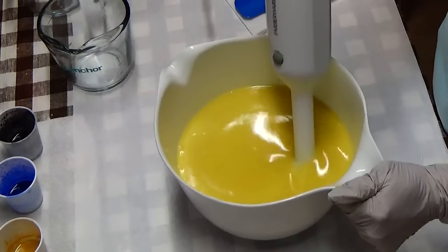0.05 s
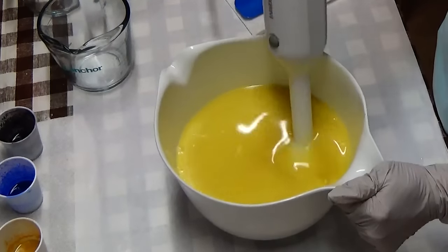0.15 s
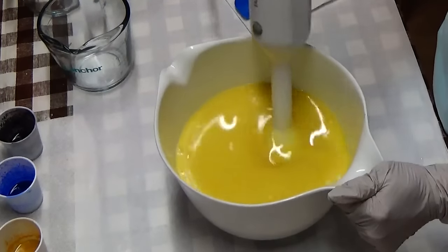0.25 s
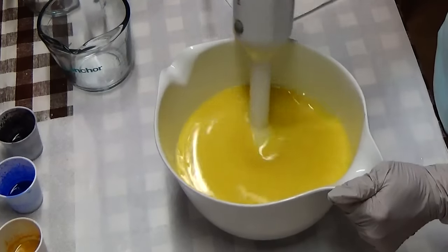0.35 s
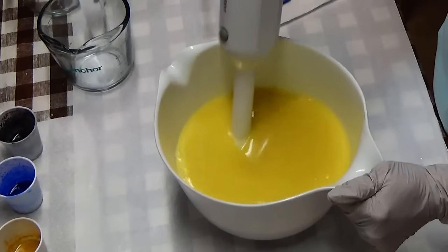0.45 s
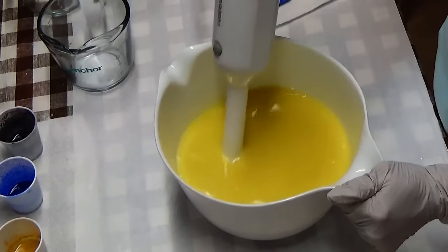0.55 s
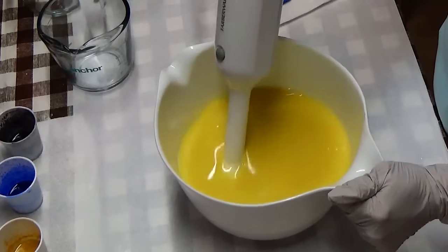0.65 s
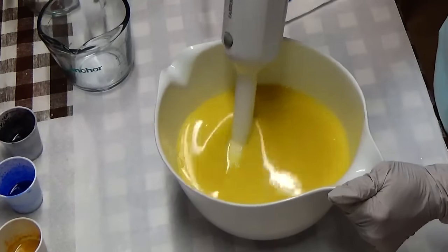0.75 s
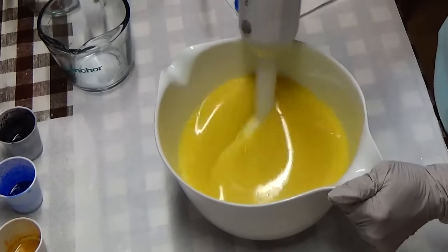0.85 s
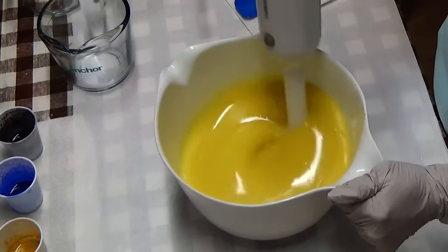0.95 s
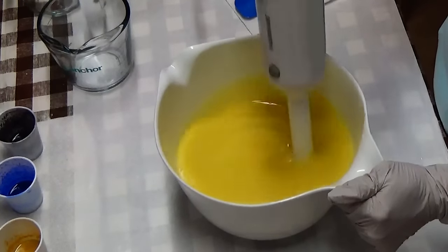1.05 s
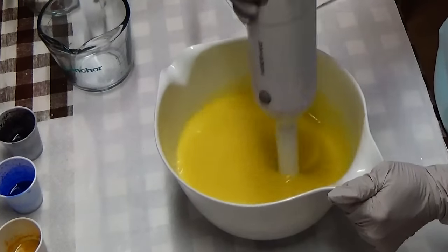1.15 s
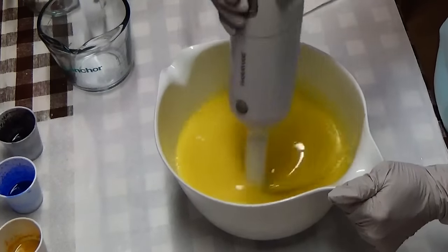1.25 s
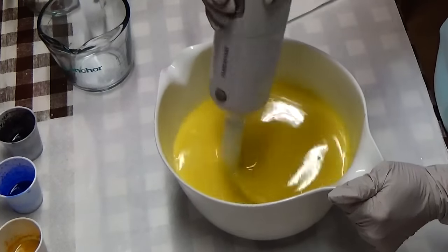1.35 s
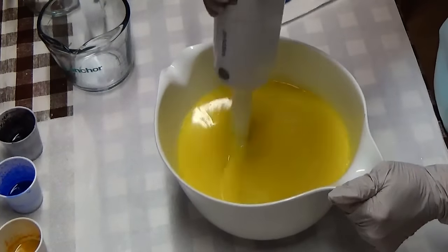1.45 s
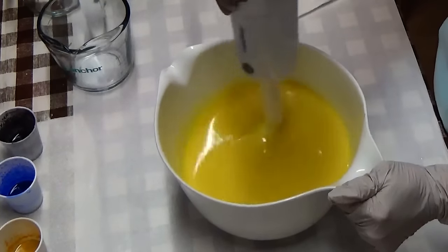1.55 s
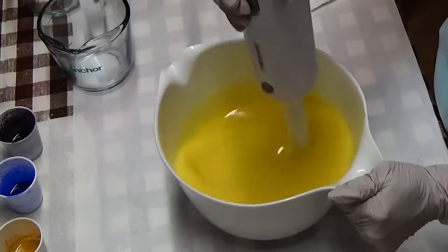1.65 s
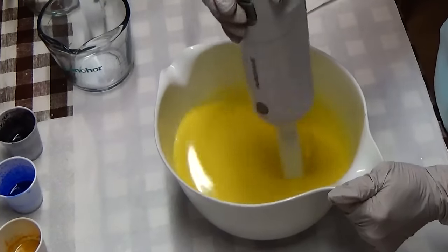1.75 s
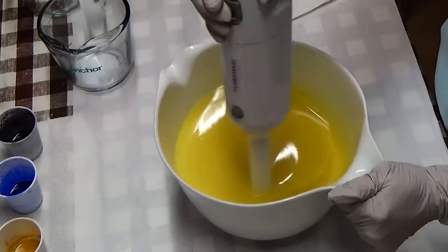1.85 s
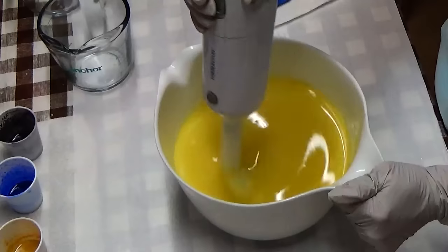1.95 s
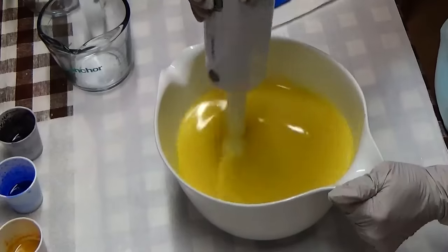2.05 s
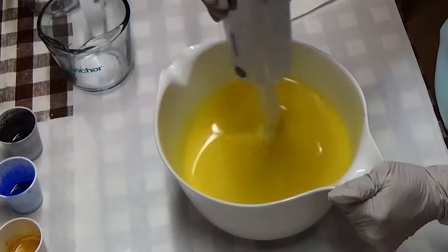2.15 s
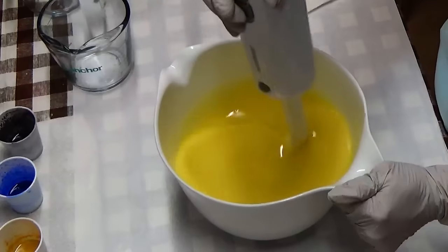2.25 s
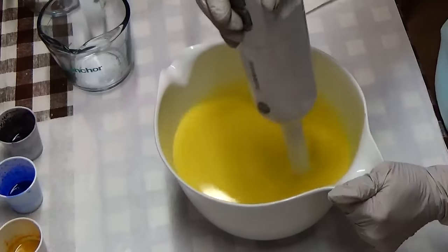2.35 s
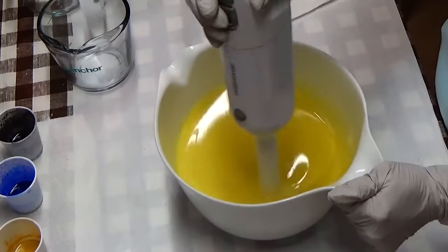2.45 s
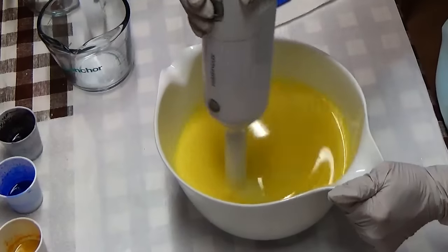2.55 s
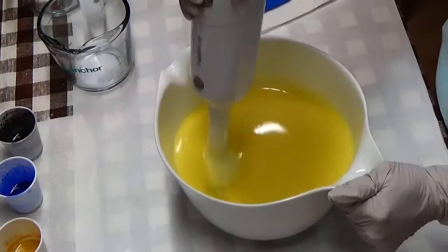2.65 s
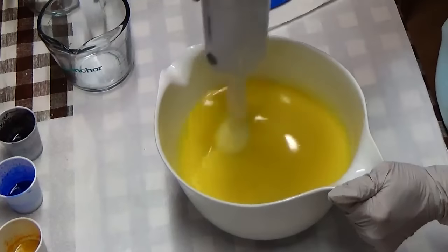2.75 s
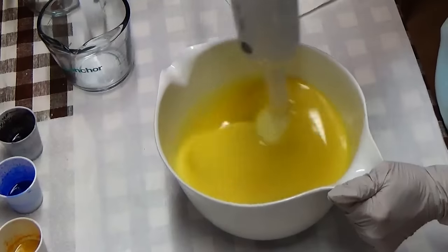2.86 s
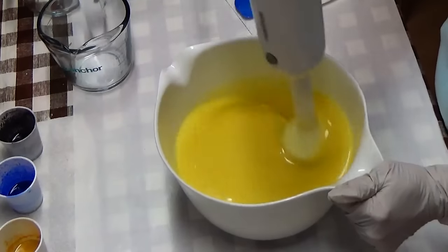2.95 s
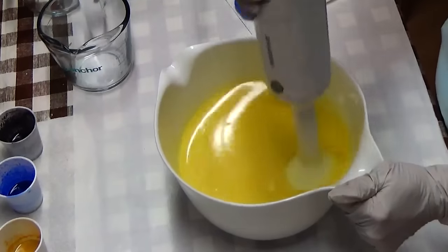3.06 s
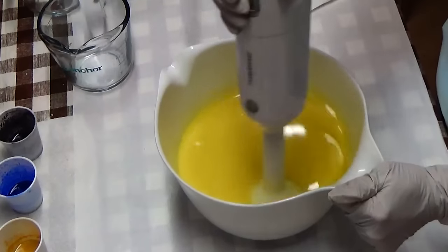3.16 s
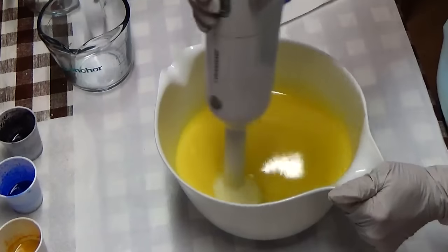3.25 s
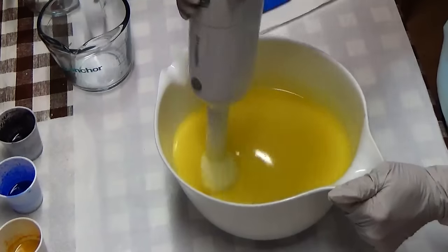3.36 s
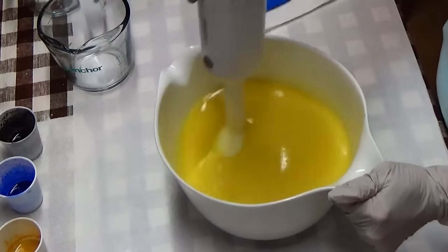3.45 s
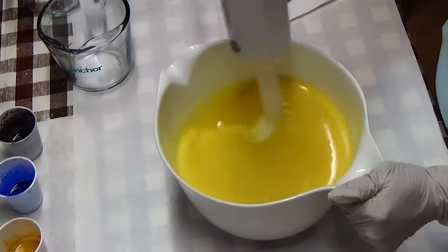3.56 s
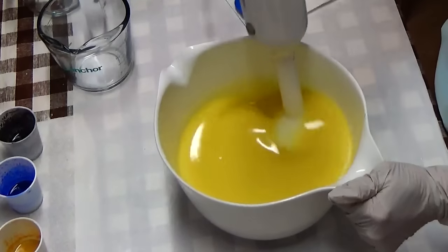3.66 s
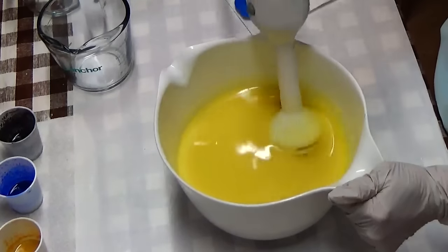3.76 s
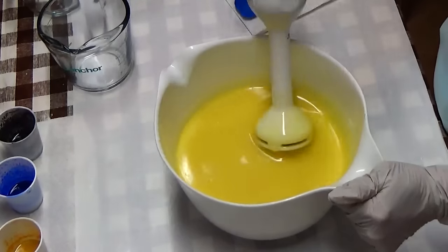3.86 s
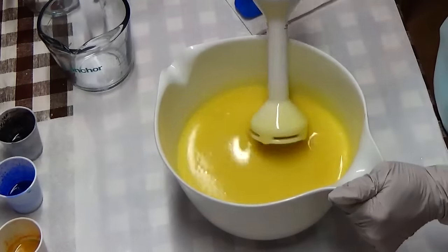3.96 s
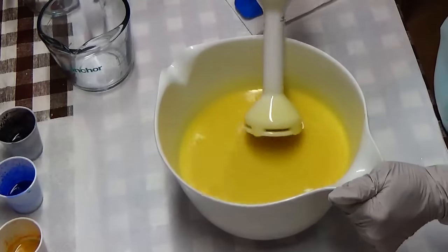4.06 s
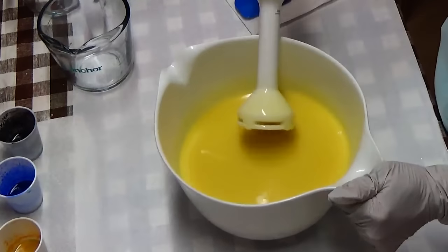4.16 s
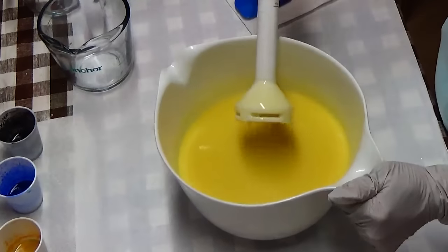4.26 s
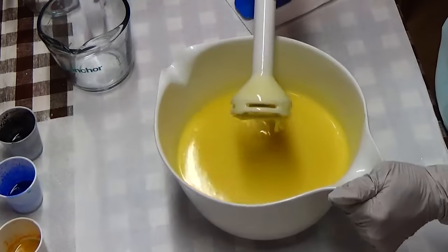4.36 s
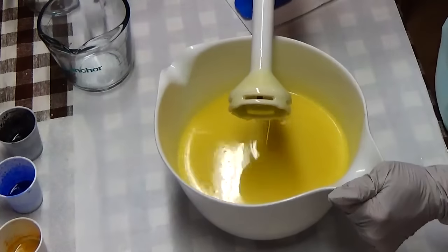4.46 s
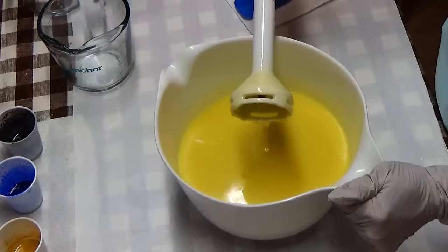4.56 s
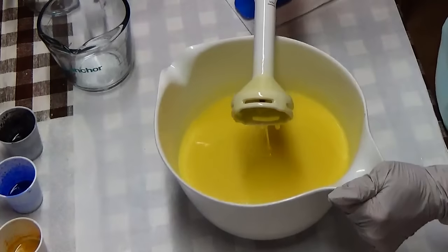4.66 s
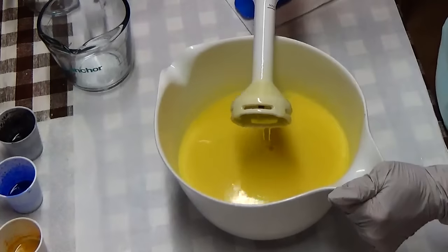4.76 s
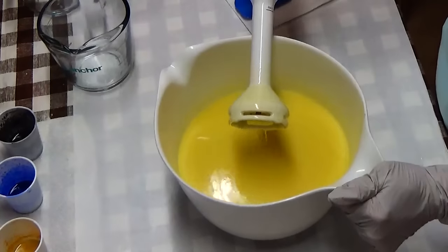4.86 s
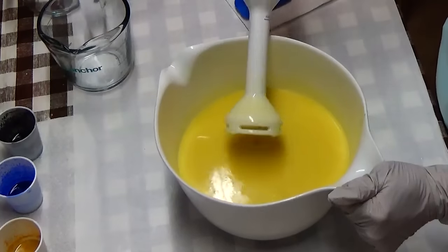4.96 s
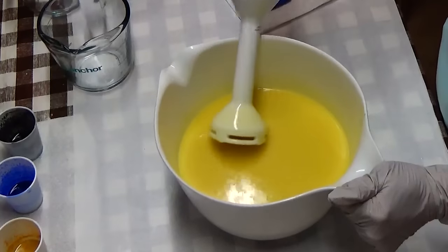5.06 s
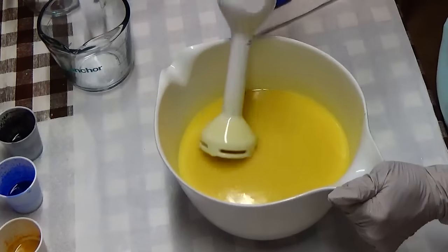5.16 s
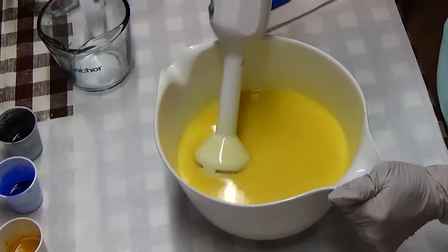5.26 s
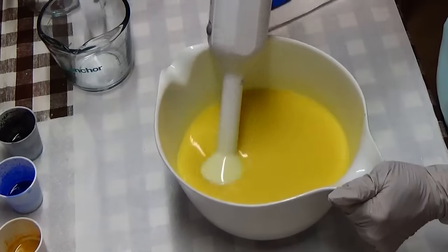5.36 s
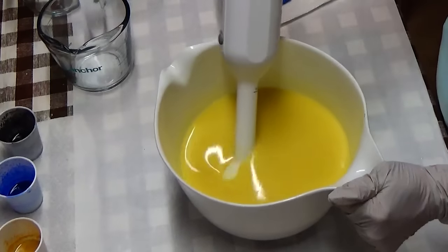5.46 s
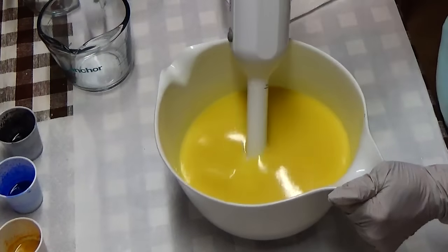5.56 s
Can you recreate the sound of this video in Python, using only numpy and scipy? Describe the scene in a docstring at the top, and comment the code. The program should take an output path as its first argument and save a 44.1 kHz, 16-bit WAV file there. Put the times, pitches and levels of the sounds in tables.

```python
"""At a kitchen table, a stick blender is switched off in a plastic bowl of thick batter and spins down.
Its hum sinks in pitch while the whirr of its housing and the hiss of its motor brushes fade.
The bell (the cup around the blades) is stirred round by hand, knocking and rubbing on the bowl,
then lifted out with a slurp and put back. Knocks ring the bell and bowl and thud into the table.
A tiny motor nearby ticks steadily over a soft hiss."""
import sys
import numpy as np
from scipy import signal
from scipy.fft import rfft, irfft
from scipy.io import wavfile

SR = 44100
rng = np.random.default_rng(int(sys.argv[2]) if len(sys.argv) > 2 else 0)


def bounce(signal):
    """Save signal as a 16-bit WAV file at the path given by the first command-line argument."""
    frames = np.transpose(np.atleast_2d(signal))
    limited = np.clip(frames, -1, 1)
    pcm = np.round(limited * 32767).astype(np.int16)
    wavfile.write(sys.argv[1], SR, pcm)


N = 246959

# The bowl's low notes. Each row: pitch in Hz, level in dB, seconds to fade by 60 dB.
BOWL_NOTES = [(215, -3, .06), (290, -2, .045), (380, -2, .045), (440, -2, .04), (510, -1, .05),
              (630, 0, .06), (700, 0, .065), (800, 0, .05), (950, 1, .05)]


def amp(db):
    """Turns decibels into a gain."""
    return 10 ** (np.asarray(db) / 20)


def unit_level(x):
    """Scales a sound to an average (rms) level of 1."""
    return x / np.sqrt(np.mean(x ** 2) + 1e-20)


def unit_start(x, seconds):
    """Scales a sound so that its first moments have an average (rms) level of 1."""
    return x / np.sqrt(np.mean(x[:int(seconds * SR)] ** 2))


def in_time(rows, size=N):
    """Joins timed rows with straight lines, giving one curve for each column after the time."""
    times, *columns = np.transpose(rows)
    return [np.interp(np.arange(size) / SR, times, column) for column in columns]


def at_hz(points, hz):
    """Reads a value between the rows of a frequency table, spaced by octaves."""
    freqs, values = np.transpose(points)
    return np.interp(np.log(hz), np.log(freqs), values)


def ring(x, hz, fade_s):
    """Each click in x starts a note that fades by 60 dB in fade_s."""
    r, w = amp(-60 / (fade_s * SR)), 2 * np.pi * hz / SR
    return signal.lfilter([0, np.sin(w)], [1, -2 * r * np.cos(w), r * r], x + 1e-18)


def ring_notes(x, notes):
    """Rings several notes at once, as a struck object does."""
    return sum(amp(db) * ring(x, hz, fade_s) for hz, db, fade_s in notes)


def resonances(x, peaks):
    """Keeps a band of x around each peak and adds the bands with alternating signs."""
    out = 0
    for k, (hz, width, db) in enumerate(peaks):
        r = np.exp(-np.pi * width / SR)
        feed = (1 - r * r) / 2 * np.array([1, 0, -1])
        feedback = [1, -2 * r * np.cos(2 * np.pi * hz / SR), r * r]
        out = out + (-1) ** k * amp(db) * signal.lfilter(feed, feedback, x)
    return out


def shaped_noise(spectrum, likeness, size):
    """Stereo noise; likeness says how alike left and right are at each frequency."""
    hz = np.maximum(np.fft.rfftfreq(size, 1 / SR), 1)
    mid, side = rfft(rng.standard_normal((2, size))) * amp(at_hz(spectrum, hz))
    alike = np.clip(at_hz(likeness, hz), -1, 1)
    return unit_level(irfft(np.sqrt(1 + alike) * mid + np.sqrt(1 - alike) * side * [[1], [-1]], size))


def pan(x, db):
    """Makes stereo, with the left side db louder than the right."""
    return x * amp([[db / 2], [-db / 2]])


def clicks(per_s):
    """Random clicks of uneven size."""
    hits = rng.random(N) < per_s / SR
    return hits * amp(4.4 * np.minimum(rng.exponential(1, N), 3.5)) * rng.choice([-1, 1], N)


def flutter(size, per_s):
    """A random wobble around zero."""
    knots = rng.standard_normal(int(size / SR * per_s) + 2)
    return np.interp(np.arange(size) / SR * per_s, np.arange(len(knots)), knots)


def background_hiss(level_db):
    """A soft, wide hiss, strongest in the bass."""
    # Each row: frequency in Hz, relative level in dB.
    spectrum = [(15, -42.5), (25, 0), (59, 1), (173, -7), (247, -4.5), (319, -2), (518, -3.5), (907, -8),
                (1710, -8), (2930, -8), (3160, -11), (3500, -9.5), (3770, -13), (10200, -16.5),
                (11000, -18), (14300, -51), (22000, -120)]
    # Each row: frequency in Hz, how alike left and right are (1 means the same).
    likeness = [(60, .94), (140, .7), (350, 1), (830, 0.066), (1990, 0.24), (4790, 0.39), (11500, 0.57)]
    return amp(level_db) * shaped_noise(spectrum, likeness, N + 1)[:, :N]


def ticks(level_db, per_s=29.97, first_s=.0244, length_s=.009):
    """The tiny motor buzzes briefly at each step; every second step is brighter."""
    # Each row: pitch in Hz, width in Hz, level in dB, accent in dB added and taken away in turn.
    bands = [(2570, 250, -4, 0), (2926, 340, 0, 1.5), (3310, 160, -6, 0), (4400, 350, -13, 5.5)]
    steps = (np.arange(N) / SR - first_s) * per_s
    step = np.floor(steps).astype(int) + 1
    gate = (steps % 1 < length_s * per_s) * np.exp(-2.5 * (steps % 1))
    out = 0
    for hz, width, db, accent_db in bands:
        chance_db = rng.normal(0, 2.2, step.max() + 1)[step]
        strength = amp(db + accent_db * (-1.) ** step + chance_db)
        tone = np.sin(2 * np.pi * (hz * np.arange(N) / SR + rng.random(step.max() + 1)[step]))
        buzz = tone + 4 * rng.standard_normal(N)
        out = out + resonances(gate * strength * buzz, [(hz, width, 0)])
    return pan(amp(level_db) * unit_level(out), db=3)


def room_echo(x, fade_s=.15, level_db=-8.5):
    """The room adds a short, dull tail, different on the left and right."""
    t = np.arange(SR // 2) / SR
    tail = rng.standard_normal((2, len(t))) * np.exp(-np.log(1000) * t / fade_s) * (t > .0025)
    tail = signal.lfilter(*signal.butter(2, [200, 7900], "band", fs=SR), tail)
    tail /= np.sqrt(np.sum(tail ** 2, axis=1, keepdims=True))
    return amp(level_db) * signal.fftconvolve(x[None], tail, axes=1)[:, :N]


def table_thud(x, tune=1, hz=87, width_hz=29):
    """The table top booms; passing its resonance twice makes the sound swell before it dies."""
    top = [(hz * tune, width_hz, 0)]
    return resonances(resonances(x, top), top)


def tings():
    """Two light touches set glass ringing faintly."""
    # Each row: start in seconds, change to the low notes in dB, to the high notes in dB, level in dB.
    touches = [(1.048, -25, 0, -50), (3.166, 0, -4, -54)]
    # Each row: pitch in Hz, level in dB, fade time in seconds.
    glass_notes = [(1420, -5.5, 0.48), (3480, -4, 0.44), (4430, -9, 0.17), (5720, -4.5, 0.18),
                   (8200, -9, .12), (10200, -8.5, 0.14)]
    out = np.zeros(N)
    for start, low_db, high_db, level_db in touches:
        click = np.arange(N) == round(start * SR)
        for hz, db, fade_s in glass_notes:
            out += amp(level_db + db + (high_db if hz > 7000 else low_db)) * ring(click, hz, fade_s)
    return out


def slurp():
    """Air pockets burst in gulps as the bell lifts out of the batter."""
    # Each row: loudest moment in seconds, level in dB, rise and fall in dB per second.
    gulps = [(3.8, -60, 1500, 300), (3.975, -58.5, 250, 901), (4.05, -57.5, 1500, 77),
             (4.215, -60.5, 90, 500)]
    # Each row: pitch in Hz, width in Hz, level in dB.
    wet_peaks = [(326, 55, 4), (475, 32, 7), (670, 90, -5.5), (890, 100, -11.5), (1480, 110, -12.5)]
    t = np.arange(N) / SR
    level = sum(amp(db - np.maximum(rise * (s - t), fall * (t - s))) for s, db, rise, fall in gulps)
    pops = resonances(clicks(per_s=1500), wet_peaks)
    return level * unit_level(resonances(pops, [(600, 1200, 0)]))


def rub():
    """The dragging bell makes many tiny slips, which ring the bowl's low notes."""
    # Each row: time in seconds, level in dB.
    levels = [(0, -35.5), (.3, -45), (.75, -82), (.95, -61.5), (2.35, -61), (2.6, -67), (3.7, -65.5),
              (4.3, -74), (5.3, -73), (5.6, -62)]
    duller_notes = [(hz, db - 4 * np.log2(hz / 500), .8 * fade_s) for hz, db, fade_s in BOWL_NOTES]
    return amp(in_time(levels)[0]) * unit_level(ring_notes(clicks(per_s=900), duller_notes))


def knocks():
    """The bell hits the bowl: a short, rough push rings both with a sharp crack, and the table thuds."""
    # Each row: start in seconds, bell peak in dB, opening levels of thud, bowl and crack in dB,
    # then the pitches in Hz near which bell and bowl ring most.
    hits = [(0.7276, -33, -58, -55, -46.5, 1230, 390), (0.8834, -46, -47.5, -55, -56, 2100, 678),
            (0.9906, -33.5, -51, -48, -58, 1420, 714), (1.0007, -37.5, -45.5, -51, -42, 1480, 213),
            (1.1104, -41, -42, -51, -45.5, 1850, 710), (1.1149, -33.5, -39.5, -52, -43.5, 1940, 686),
            (1.2277, -38, -40.5, -40.5, -35, 3320, 312), (1.2804, -35, -44.5, -44, -54, 1800, 487),
            (1.3978, -29.5, -37.5, -42, -61, 1980, 475), (1.4114, -29, -34.5, -35.5, -68, 1860, 520),
            (1.431, -43, -37.5, -38.5, -58, 1500, 345), (1.459, -34.5, -42, -45, -68, 1800, 220),
            (1.493, -31, -40.5, -45.5, -44, 1870, 719), (1.5276, -43.5, -38.5, -49.5, -65, 1260, 530),
            (1.6518, -33.5, -40, -45, -40.5, 1570, 218), (1.731, -29, -36, -45, -37.5, 1240, 207),
            (1.8051, -29, -38, -40.5, -41.5, 1390, 510), (1.8874, -40.5, -51, -46, -63, 1860, 213),
            (1.9624, -66, -78, -80, -57.5, 3260, 770), (2.0325, -44.5, -75, -76, -71, 1850, 385),
            (2.1134, -18.5, -38, -30.5, -34.5, 1360, 230), (2.1393, -33, -52, -40, -57, 1000, 224),
            (2.1784, -39, -44, -43.5, -80, 2090, 233), (2.2627, -36.5, -43, -47.5, -68, 1780, 213),
            (2.3541, -32, -41, -44.5, -59, 1600, 494), (2.421, -30.5, -44.5, -47, -33.5, 1630, 625),
            (2.521, -44, -56, -52.5, -53, 2750, 223), (2.5313, -34, -69, -56, -37, 1480, 510),
            (2.7298, -26, -50, -38, -68, 1880, 410), (2.7815, -36, -57, -48, -59, 1910, 280),
            (2.8848, -35.5, -63, -53.5, -69, 1610, 506), (2.9377, -37, -51.5, -53.5, -60.5, 1480, 500),
            (3.0732, -42.5, -59, -57.5, -71, 1700, 680), (3.1306, -36, -56, -53.5, -43.5, 2000, 654),
            (3.235, -43, -62, -53, -62, 1360, 485), (3.3025, -43, -61.5, -52.5, -58.5, 1480, 484),
            (3.4328, -38.5, -59, -51.5, -59, 1870, 514), (3.4964, -40.5, -69, -50.5, -41, 1840, 288),
            (3.5941, -35.5, -51.5, -51, -37.5, 1480, 213), (3.6746, -42, -53.5, -54, -66, 1750, 315),
            (3.7948, -63, -75, -59, -66, 2880, 430), (3.938, -50, -79.5, -59.5, -73, 1520, 470),
            (4.5793, -51, -75.5, -66.5, -70, 2860, 865), (5.3585, -27, -64, -34.5, -46, 1490, 692),
            (5.3984, -49, -67, -58.5, -57.5, 1150, 608), (5.4523, -43.5, -68, -59.5, -62, 1850, 710),
            (5.5072, -51, -51, -52.5, -77, 2490, 460), (5.5178, -47.5, -43, -40.5, -77, 1870, 373),
            (5.5822, -45.5, -51, -43, -72, 1880, 286)]
    # Each row: pitch in Hz, fade time in seconds.
    bell_notes = [(1080, .025), (1220, .022), (1350, .025), (1490, .028), (1610, .022), (1800, .028),
                  (1900, .03), (2010, .025), (2160, .02), (2400, .016), (2650, .016), (2950, .018),
                  (3320, .014), (3700, .012)]
    # Each row: pitch in Hz, level in dB, fade time in seconds.
    crack_notes = [(4030, 8, 0.0013), (4560, -2.5, 0.00067), (5150, 0.5, 0.0023), (5700, -1.5, 0.0017),
                   (6170, 2, 0.0029), (6940, -21, 0.0012), (8140, -18, 0.0015), (8870, 2, 0.0013),
                   (9850, -5.5, 0.00076), (11700, 2, 0.0012)]
    size = SR // 4
    out, t = np.zeros((2, N + size)), np.arange(size) / SR
    thin = signal.butter(2, 600, "high", fs=SR, output="sos")  # the small bell has no bass
    for start, bell_db, thud_db, bowl_db, crack_db, bell_hz, bowl_hz in hits:
        contact_ms = 1.986 * amp(.2327 * (bowl_db - crack_db))  # duller knocks touch for longer
        age = t * 1000 / contact_ms
        push = rng.standard_normal(size) * np.sqrt(age) * np.exp(-age)
        bell_luck, bowl_luck, crack_luck = rng.normal(0, 2.5, (3, len(bell_notes)))  # dB per note
        tune = amp(rng.normal(0, .45))  # moving batter detunes bowl and table
        bell = ring_notes(push, [(hz, luck - 16 * abs(np.log2(hz / bell_hz)), fade_s)
                                 for (hz, fade_s), luck in zip(bell_notes, bell_luck)])
        bowl = ring_notes(push, [(hz * tune, db + luck - 17 * abs(np.log2(hz / bowl_hz)), fade_s)
                                 for (hz, db, fade_s), luck in zip(BOWL_NOTES, bowl_luck)])
        crack = ring_notes(push * age * np.exp(-.7 * age),
                           [(hz, db + luck, fade_s)
                            for (hz, db, fade_s), luck in zip(crack_notes, crack_luck)])
        bell = signal.sosfilt(thin, bell)
        # The heavy bowl feels a softer blow.
        soft = signal.butter(2, [.64 * bowl_hz, 1500], "band", fs=SR, output="sos")
        knock = amp(bell_db) * bell / np.max(np.abs(bell))
        knock += amp(crack_db) * unit_start(crack, seconds=.0027)
        knock += amp(bowl_db) * unit_start(signal.sosfilt(soft, bowl), seconds=.017)
        thud = amp(thud_db) * unit_start(table_thud(t == 0, tune), seconds=.029)
        i = round(start * SR)
        out[:, i:i + size] += pan(knock, db=-.3) + thud
    return out[:, :N]


def churn(size):
    """Swirling batter makes a hollow noise."""
    # Each row: time in seconds, level in dB.
    levels = [(0, -32), (.45, -41), (.65, -48), (1, -70)]
    # Each row: pitch in Hz, width in Hz, level in dB.
    hollow_peaks = [(324, 74, -10.5), (410, 58, -5), (498.7, 35, 4), (680, 60, -3)]
    return amp(in_time(levels, size)[0]) * unit_level(resonances(rng.standard_normal(size), hollow_peaks))


def shake(turns):
    """Each turn of the shaft jolts the bowl and the table."""
    # Each row: time in seconds, jolt strength in dB.
    levels = [(0, -47), (.1, -47), (.18, -72), (.32, -45), (.45, -54), (.52, -56), (.95, -78)]
    jolt_db = in_time(levels, len(turns))[0] + .58 * rng.standard_normal(len(turns))
    jolts = np.diff(np.floor(turns), prepend=0) * amp(jolt_db)
    return ring_notes(jolts, BOWL_NOTES) + amp(58.5) * table_thud(jolts)


def brush_hiss(coast_s, throb):
    """The motor brushes hiss. After switch-off this drops fast, and a fainter hiss lingers."""
    # Each row: frequency in Hz, relative level in dB.
    spectrum = [(1760, -38), (3000, -3.5), (3380, -6), (4580, -5.5), (4970, -7), (5640, -8), (6460, -3.5),
                (8160, -10), (11000, -9.5), (14300, -49), (22000, -120)]
    level_db = np.maximum(-23 - 75 * coast_s, -34.5 - 41 * coast_s)
    return amp(level_db) * shaped_noise(spectrum, [(100, .48), (9000, .82)], len(throb)) * throb


def housing_whirr(throb):
    """Throbbing motor noise rings the blender's housing."""
    # Each row: time in seconds, level in dB.
    levels = [(0, -20.5), (.13, -19), (.22, -26), (.3, -35), (.52, -48), (.72, -58.5), (1, -56.5)]
    # Each row: pitch in Hz, width in Hz, level in dB.
    housing_peaks = [(1520, 254, 3), (1800, 500, 1), (2178, 350, -0.5), (2750, 360, -6.5), (1150, 180, -43),
                     (692, 65, -12.5)]
    noises = rng.standard_normal((2, len(throb)))
    mid, side = [unit_level(resonances(noise * throb, housing_peaks)) for noise in noises]
    return amp(in_time(levels, len(throb))[0]) * (mid + .33 * side * [[1], [-1]])


def shaft_hum(t, coast_s, speed, turns, hold_s=.2, fall_db_per_s=112):
    """The shaft hums at multiples of its speed; each tone swells as it slides through a resonance."""
    # Relative levels in dB of the tones at 1 to 8 times the shaft's speed.
    tone_levels = [-10, 0, -4, -10, -12, -8, -4, -16]
    # The way out through bell, batter and bowl. Each row: frequency in Hz, boost or cut in dB.
    path = [(40, -30), (75, 2), (97, 12), (130, -2), (165, -22), (198, -22), (217, -11), (280, -5),
            (335, -20), (400, 0), (480, 0), (580, -16), (650, -16), (700, -4), (780, -14), (868, -5),
            (1150, -22), (1520, 0)]
    hum_db = np.maximum(-19.5 - fall_db_per_s * np.maximum(t - hold_s, 0), -53)
    wobble_db = 1.5 + 5 * (1 - speed / speed[0])  # the unpowered shaft runs unevenly
    out = 0
    for k, db in enumerate(tone_levels, 1):
        level_db = hum_db + db - 7 * k * coast_s  # higher tones fade faster
        level_db += at_hz(path, k * speed) + wobble_db * flutter(len(t), per_s=30)
        out = out + amp(level_db) * np.sin(2 * np.pi * (k * turns + rng.random()))
    return out


def blender(full_turns_per_s=217.3, switch_off_s=.147, slowing_s=.295, wall_s=.004, wall_db=-14):
    """The blender runs at full speed, then coasts down once it is switched off."""
    size = SR
    t = np.arange(size) / SR
    coast_s = np.maximum(t - switch_off_s, 0)
    speed = full_turns_per_s * np.exp(-coast_s / slowing_s)
    turns = np.cumsum(speed) / SR
    throb = 1 + .25 * np.sin(4 * np.pi * turns)  # two blades pass per turn
    low = churn(size) + shaft_hum(t, coast_s, speed, turns) + shake(turns)
    # A side wall sends the low sound back, with opposite signs left and right.
    wall = amp(wall_db) * np.interp(t - wall_s, t, low) * [[1], [-1]]
    fade_out = np.clip((size - np.arange(size)) / 2000, 0, 1)
    out = np.zeros((2, N))
    out[:, :size] = (low + wall + housing_whirr(throb) + brush_hiss(coast_s, throb)) * fade_out
    return out


def scene():
    """The blender, and the bowl sounds with their echo, over hiss and ticks."""
    # Each row: time in seconds, hiss level in dB, tick level in dB.
    background_levels = [(.6, -54.5, -65.5), (1.2, -57.5, -67), (3.3, -61, -64.5), (4.1, -61, -68),
                         (4.4, -63, -73.5), (5.6, -63.5, -68.5)]
    hiss_db, tick_db = in_time(background_levels)
    bowl = knocks() + rub() + slurp() + tings()
    bass_cut = signal.butter(2, 55, "high", fs=SR, output="sos")  # small things give off no deep bass
    near = signal.sosfilt(bass_cut, blender() + bowl)
    return near + background_hiss(hiss_db) + room_echo(bowl.mean(axis=0)) + ticks(tick_db)


def record(dry):
    """Cuts the treble steeply above 11050 Hz."""
    return signal.sosfilt(signal.ellip(12, .5, 60, 11050, fs=SR, output="sos"), dry)


dry = scene()
out = record(dry)
bounce(out)
```